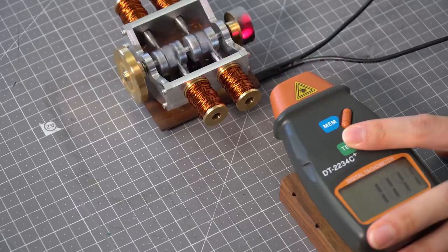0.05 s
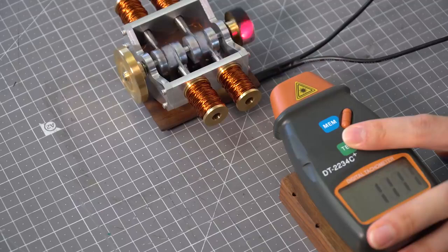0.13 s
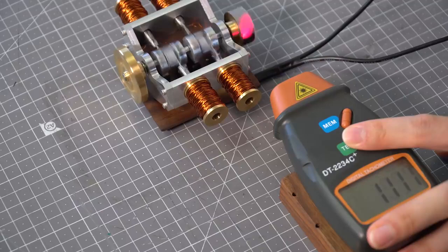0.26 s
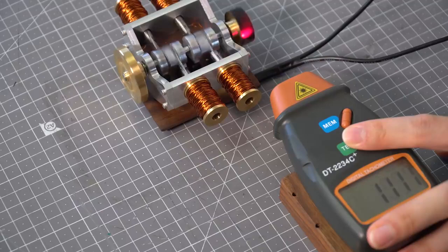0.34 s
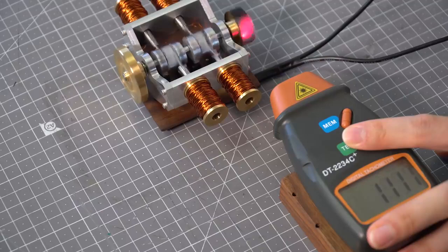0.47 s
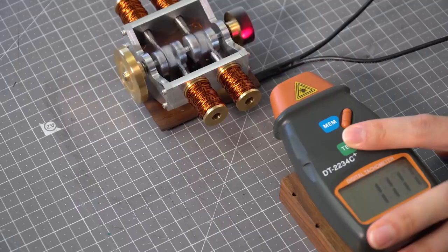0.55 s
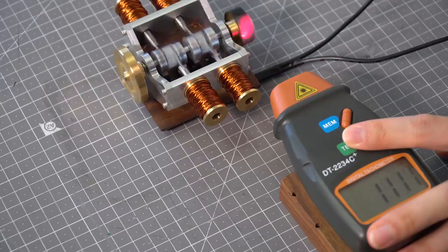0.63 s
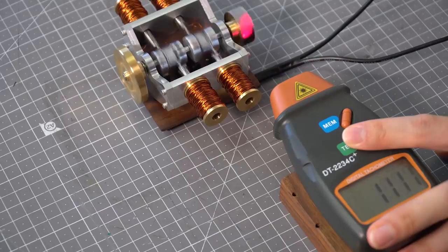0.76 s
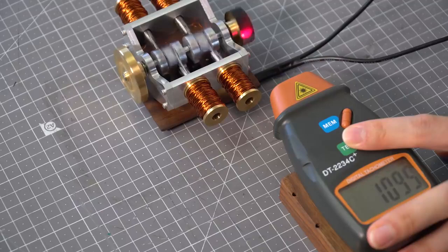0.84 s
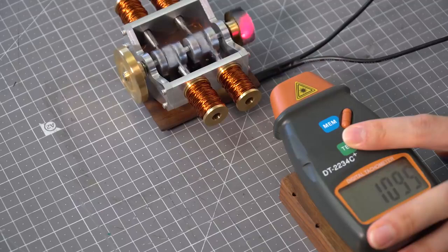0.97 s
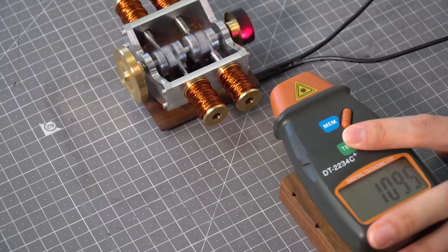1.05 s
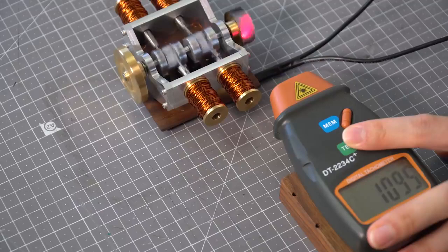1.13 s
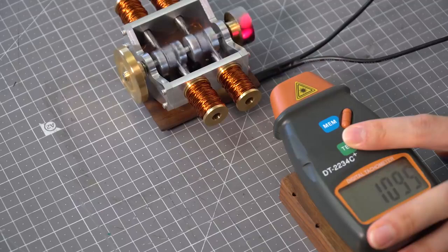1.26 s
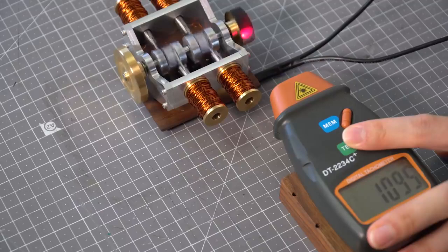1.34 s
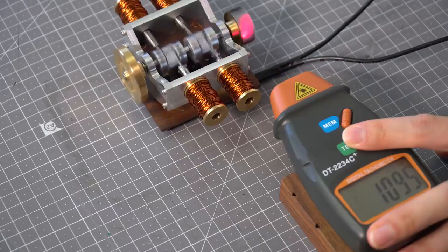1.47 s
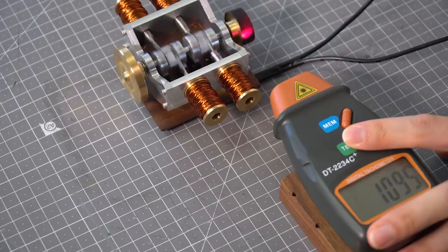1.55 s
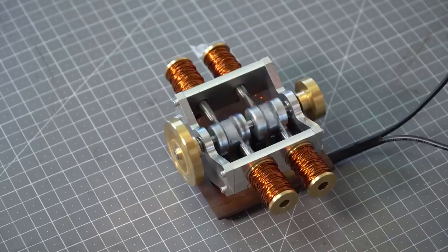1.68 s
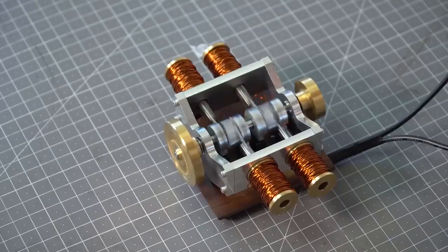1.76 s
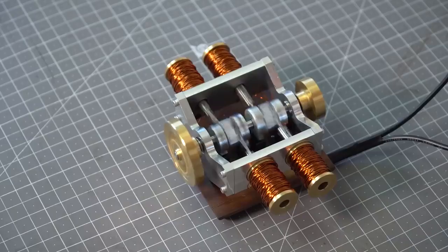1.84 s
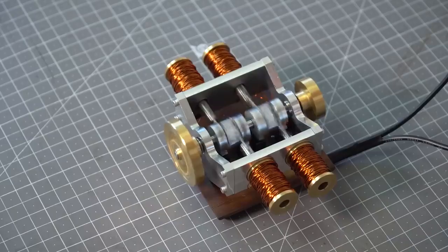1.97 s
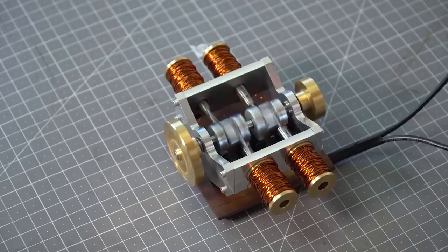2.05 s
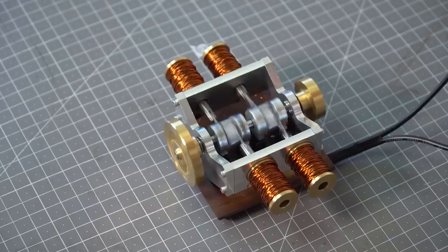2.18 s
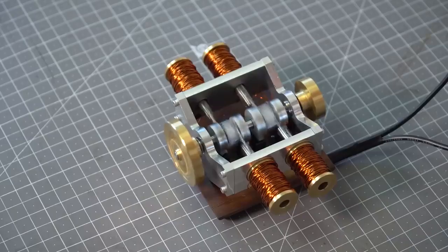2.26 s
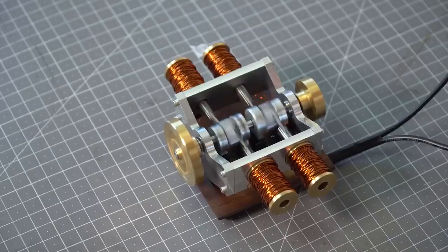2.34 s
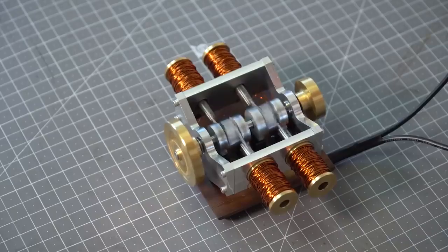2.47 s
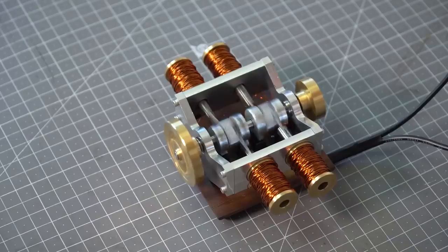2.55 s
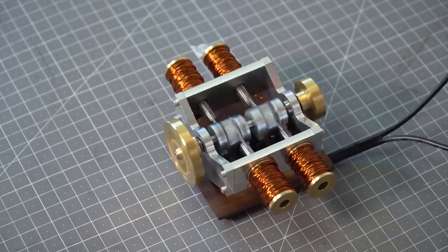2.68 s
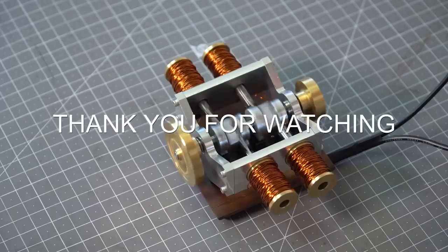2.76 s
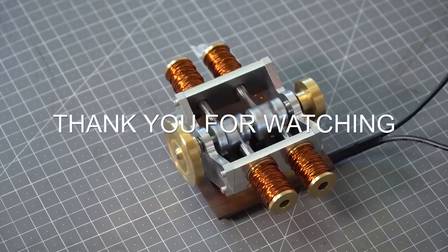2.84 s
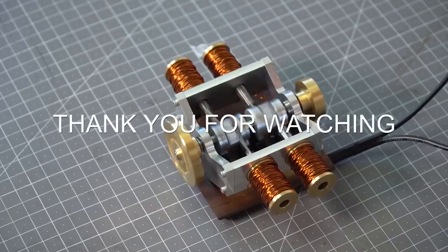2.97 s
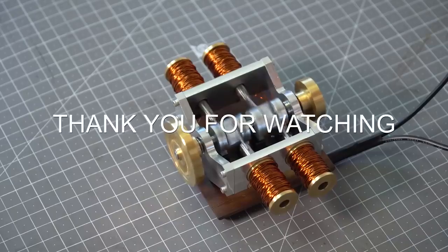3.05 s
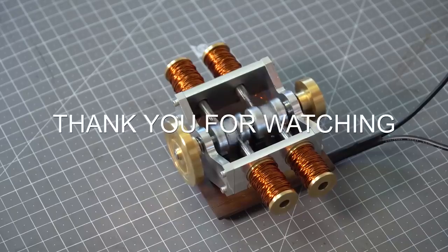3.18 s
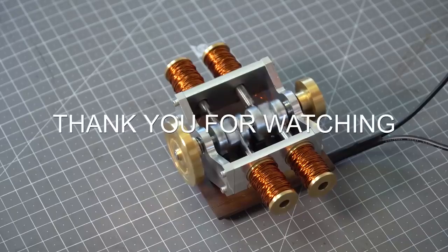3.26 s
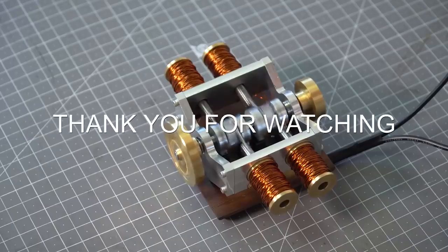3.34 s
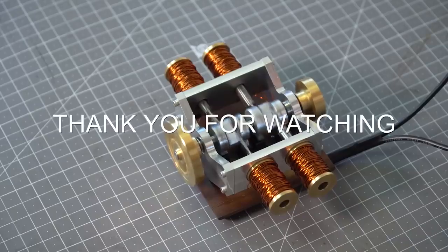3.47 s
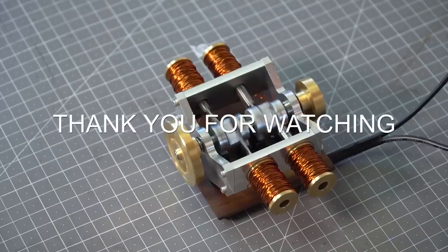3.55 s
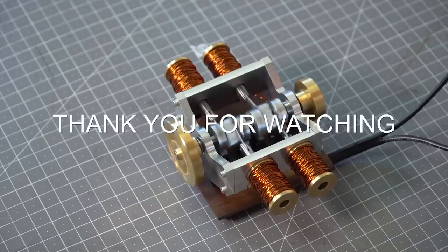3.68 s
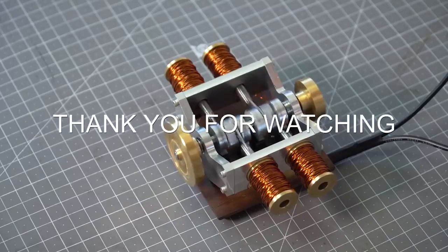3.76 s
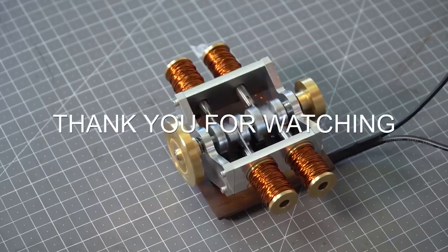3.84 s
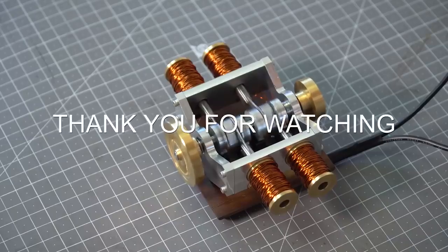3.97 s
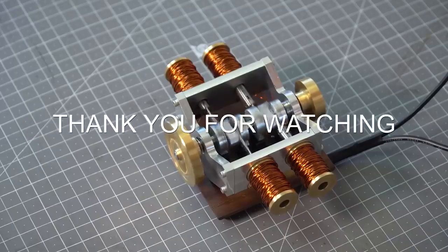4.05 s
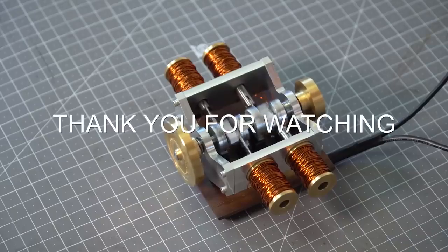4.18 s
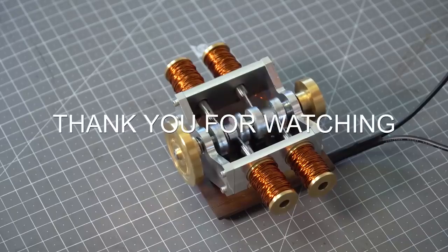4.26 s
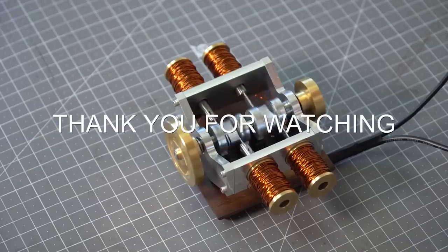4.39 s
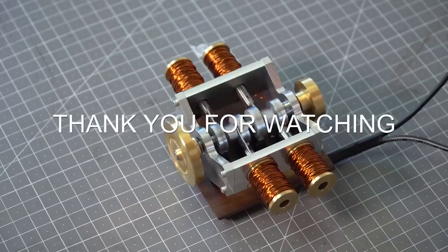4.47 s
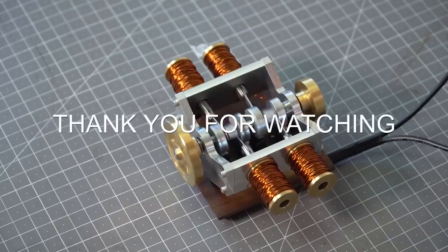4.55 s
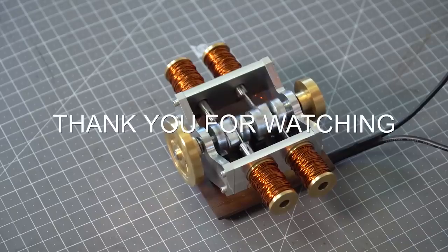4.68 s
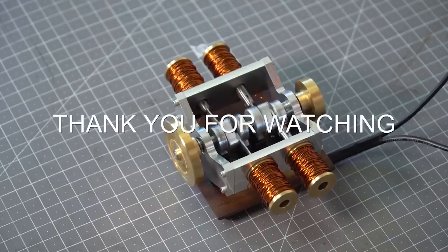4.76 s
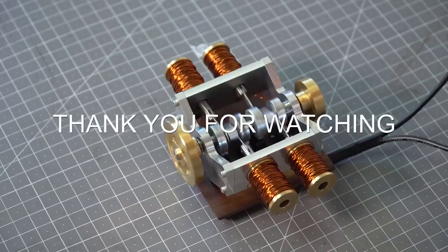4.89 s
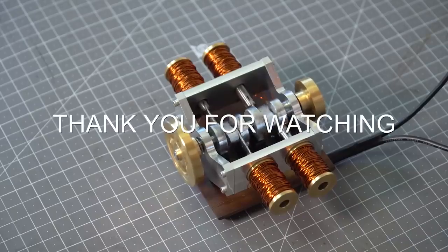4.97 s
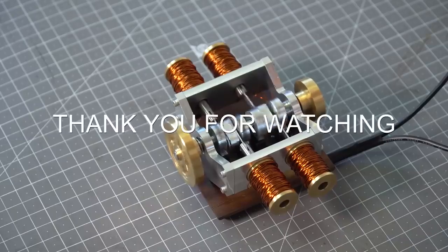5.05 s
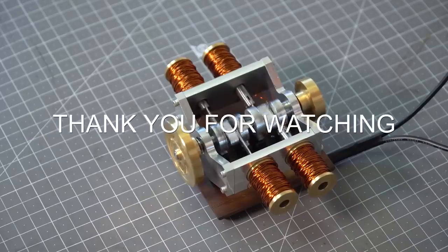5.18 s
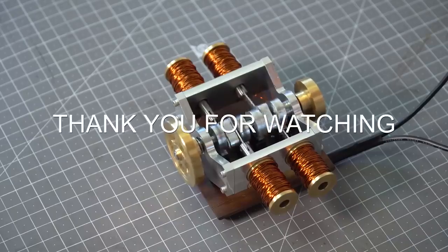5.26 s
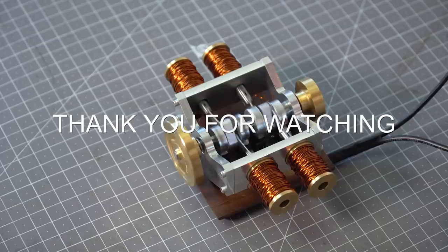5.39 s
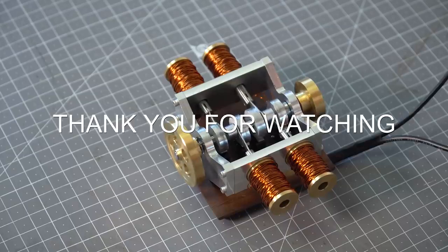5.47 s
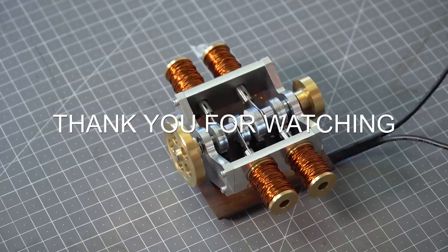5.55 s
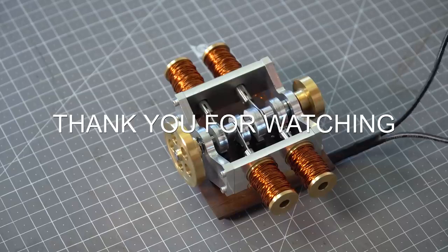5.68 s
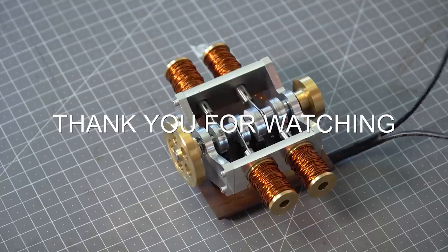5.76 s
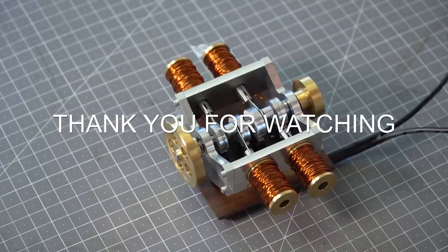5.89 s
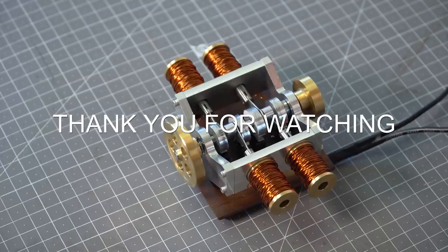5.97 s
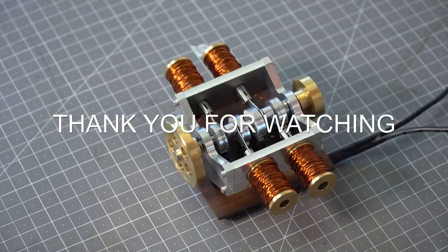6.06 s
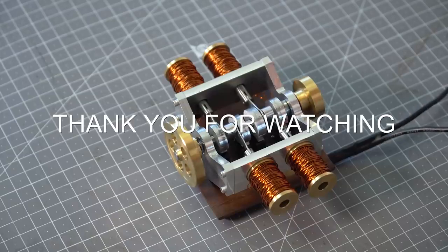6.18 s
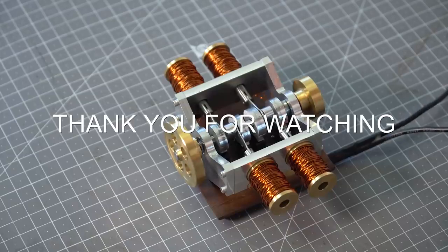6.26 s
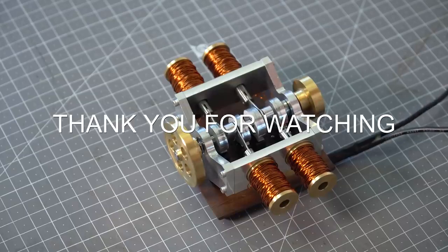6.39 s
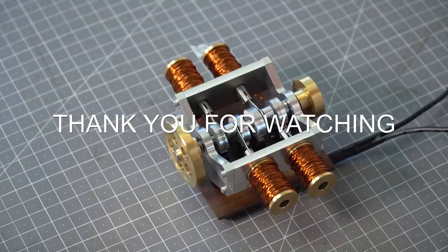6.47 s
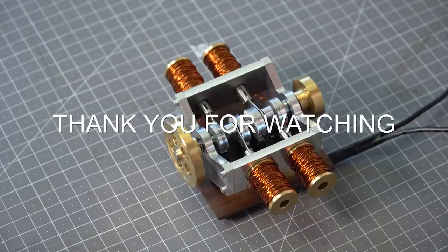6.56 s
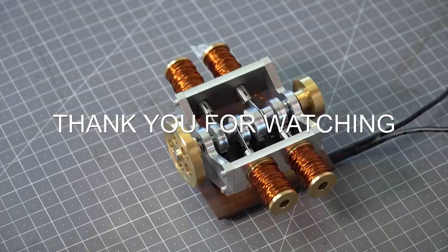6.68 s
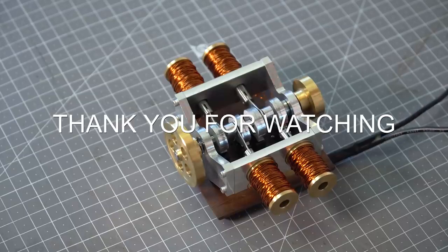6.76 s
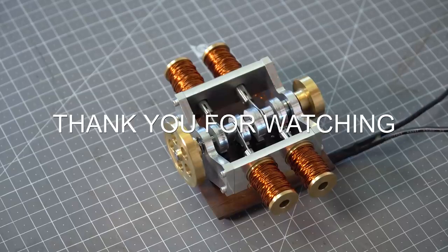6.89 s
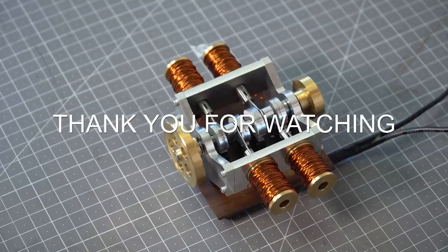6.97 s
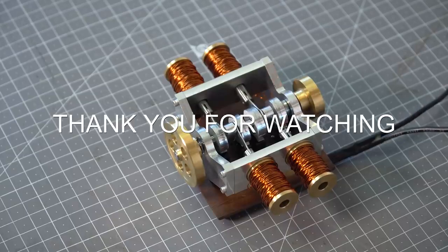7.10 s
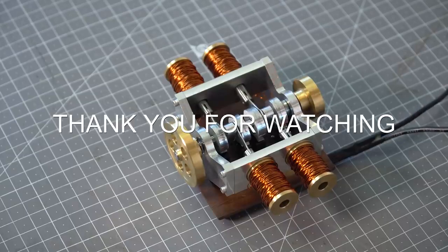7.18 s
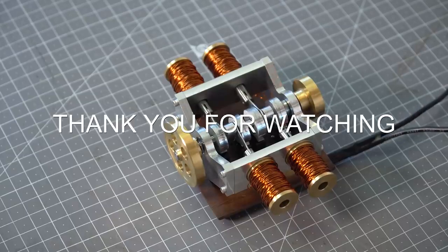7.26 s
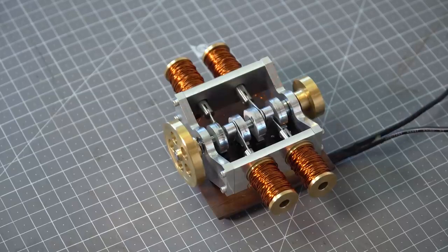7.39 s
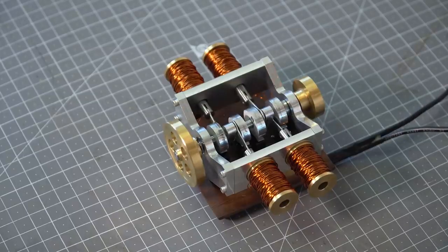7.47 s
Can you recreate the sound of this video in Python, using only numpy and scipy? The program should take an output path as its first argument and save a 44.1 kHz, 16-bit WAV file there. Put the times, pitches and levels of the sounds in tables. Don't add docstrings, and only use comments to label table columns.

```python
import sys
import numpy as np
from scipy import signal
from scipy.fft import rfft, irfft
from scipy.io import wavfile
from scipy.ndimage import uniform_filter1d

SR = 44100
rng = np.random.default_rng(int(sys.argv[2]) if len(sys.argv) > 2 else 0)


def elevation(decibels):
    levels = np.asarray(decibels, float)
    return 10 ** (levels / 20)


def persist_wave(psi):
    counts = np.round(np.clip(psi, -1, 1) * 32767).astype(np.int16)
    wavfile.write(sys.argv[1], SR, np.atleast_2d(counts).T)


N = 332068
TIME = np.arange(N) / SR
FIRST_TOP_TURN = 37

# time in seconds, bright peak in dB, knock peak in dB.
CRANK_TOPS = [(3.7634, -18, -21), (3.8515, -23, -22), (3.946, -20, -20.5), (4.0504, -11, -26),
              (4.161, -16, -25), (4.2772, -16, -23), (4.4068, -11.5, -20.5), (4.5437, -13, -21.5),
              (4.694, -11.5, -19.5), (4.8538, -19.5, -26), (5.0315, -21, -26.5), (5.239, -20, -26.5),
              (5.4676, -24, -29)]
# time in seconds, bright peak in dB.
CAM_CLICKS = [(3.665, -14), (3.748, -16), (3.8353, -15), (3.932, -16), (4.0318, -17), (4.141, -16),
              (4.258, -19.5), (4.384, -19), (4.5204, -16.5), (4.668, -19), (4.826, -17.5), (4.9987, -18),
              (5.193, -18), (5.4126, -17.5)]


def in_time(rows):
    s, *columns = np.transpose(rows)
    return [np.interp(TIME, s, column) for column in columns]


def at_hz(points, hz):
    point_hz, point_db = np.array(points).T
    return np.interp(np.log(hz), np.log(point_hz), point_db)


def rms_one(x):
    return x / np.sqrt(np.mean(x ** 2) + 1e-20)


def drift(knots_per_s):
    knots = rng.standard_normal(600)
    return np.interp(TIME * knots_per_s, np.arange(600), knots)


def high_pass(x, hz):
    return signal.sosfilt(signal.butter(2, hz, "high", fs=SR, output="sos"), x)


def left_right(mid, side):
    return np.array([mid + side, mid - side])


def background():
    # frequency in Hz, density in dB per Hz.
    floor_spectrum = [(15, -40), (25, -4), (55, 1.5), (174, -7), (282, -5.5), (369, -7), (510, -9.5),
                      (744, -17.5), (1000, -11), (1310, -18), (1500, -18.5), (1910, -23.5), (12200, -30),
                      (15600, -27)]
    # frequency in Hz, side minus mid in dB.
    floor_width = [(60, -24), (180, -5), (550, -0.5), (1650, 2), (4970, 0.5), (15000, -2)]
    hz = np.maximum(np.arange(N // 2 + 1) * SR / N, 10)
    mid, side = irfft(rfft(rng.standard_normal((2, N))) * elevation(at_hz(floor_spectrum, hz)), N)
    side = irfft(rfft(side) * elevation(at_hz(floor_width, hz)), N)
    return np.array([mid, side]) / mid.std() * elevation(-57.5)


def room(x):
    t60_s, level_db = 0.53, -6.5
    t = np.arange(SR // 2) / SR
    tails = rng.standard_normal((2, len(t))) * elevation(-60 * t / t60_s) * (t > .003)
    tails = tails / np.sqrt(np.sum(tails[0] ** 2))
    wet = signal.fftconvolve(x[None, :], tails, axes=1)[:, :N]
    wet = signal.lfilter(*signal.butter(1, 9000, fs=SR), wet)
    wet[1] = high_pass(wet[1], 1500) * elevation(-3.5)
    return elevation(level_db) * wet


def crank(table):
    (s0, k0), (s1, k1) = table[:2]
    a_second_before = (s0 - 1, k0 - (k1 - k0) / (s1 - s0))
    return in_time([a_second_before] + list(table))[0]


def rattle_db(full_db, slow_db):
    follows_speed = [0.66, 1.08, 1.134, 1.19]
    scrape_db = [8, -3, 0, 2]
    dying_db_per_s = [90, 40, 150, 140]
    after_s = TIME - 5.553
    rise = np.clip(after_s / 0.027, 0, 1)
    dying_s = np.maximum(after_s - .02, 0)
    return [db + share * slow_db + jump * rise - fall * dying_s
            for db, share, jump, fall in zip(full_db, follows_speed, scrape_db, dying_db_per_s)]


def contacts(turns, table, until_s, level_db, slack_turns, spread_db):
    driven, coasting_turns, tick_db, knock_db = np.transpose(table)
    turn = np.arange(-1, 40)[:, None]
    free = np.clip((turn - 30.0) / 9.0, 0, 1)
    luck = np.clip(rng.standard_normal((2, len(turn), len(table))), -1.4, 1.4)
    angle = turn + driven + free * (coasting_turns - driven) + slack_turns * luck[0]
    times_s = np.interp(angle, turns, TIME).ravel()
    gain_db = np.interp(times_s, TIME, level_db) + 22.5 + spread_db * luck[1].ravel()
    tick_db = np.tile(tick_db, len(turn)) + gain_db - 3
    knock_db = np.tile(knock_db, len(turn)) + gain_db
    keep = (times_s > 0) & (times_s < until_s)
    return times_s[keep], tick_db[keep], knock_db[keep] - 11, knock_db[keep] - 33


def strikes(times_s, level_db, bounce_s, fall_db):
    out = np.zeros((2, N))
    luck = rng.random((len(times_s), 10))
    for k in range(5):
        delay_s = bounce_s * (k + (k > 0) * 1.6 * (luck[:, k] - .5))
        at = np.clip(np.round((times_s + delay_s) * SR).astype(int), 0, N - 1)
        height = elevation(level_db + k * fall_db)
        np.add.at(out[0], at, height * (-1) ** k)
        np.add.at(out[1], at, height * (2 * luck[:, 5 + k] - 1))
    return out


def resonate(x, hz, width_hz):
    r = np.exp(-np.pi * width_hz / SR)
    b = [(1 - r * r) / 2, 0, (r * r - 1) / 2]
    a = [1, -2 * r * np.cos(2 * np.pi * hz / SR), r * r]
    return signal.lfilter(b, a, x + 1e-18)


def ring(x, modes, flicker_db=0):
    # frequency in Hz, side minus mid in dB.
    object_width = [(60, -65), (130, -65), (290, -19.5), (640, -9), (1410, -15.5), (3100, -5.5),
                    (6820, -1.5), (15000, -5)]
    flickers_per_s = 70
    step = np.arange(x.shape[1]) * flickers_per_s / SR
    pushes = elevation(flicker_db * rng.standard_normal((len(modes), 400)))
    out = 0
    for k, (hz, width_hz, db) in enumerate(modes):
        pushed = x * np.interp(step, np.arange(400), pushes[k]) if flicker_db else x
        mid_side = [[1], [elevation(at_hz(object_width, hz))]]
        out = out + (-1) ** k * elevation(db) * resonate(pushed, hz, width_hz) * mid_side
    return out


def uneven_drag(turns, slow_db):
    drag_angles = [.004, .06, .18, .3, .38, .46, .56, .64, .74, .82, .9, .998]
    # frame in dB, bright in dB.
    drag_db = [(4.5, 2), (3.5, 1.5), (1.5, -1), (0.5, -2), (1, 3), (1, 1.5), (0, 1.5), (-3, -0.5),
               (-1.5, -2), (-1, 0), (-2.5, 0), (-1, 0)]
    depth = 0.09 - 0.1755 * np.minimum(slow_db, 0)
    frame_db, bright_db = (depth * np.interp(turns, drag_angles, db, period=1) for db in np.transpose(drag_db))
    return depth, frame_db, bright_db


def rattle_grains(turns, size_db):
    grains_per_turn, least_per_s = 200, 500
    chance = np.maximum(grains_per_turn * np.gradient(turns), least_per_s / SR)
    size = elevation(size_db * np.minimum(rng.exponential(1, N), 2.6)) / np.sqrt(chance)
    grains = (rng.random(N) < chance) * size
    return grains * rng.choice([-1, 1], (2, N)) + 0.78 * rng.standard_normal((2, N))


def engine(turns, body, parts_db, slow_db, hits, heard, rub, size_db):
    # frequency in Hz, width in Hz, level in dB.
    rods = [(2590, 45, -3), (3030, 35, -2), (3175, 45, 2), (3380, 35, -1), (3600, 45, -2), (3963, 40, -2),
            (4420, 35, -2), (4600, 45, -2), (4800, 60, -4)]
    flicker_db = 1.6
    times_s, tick_db, knock_db, hollow_db = hits
    depth, frame_db, bright_db = uneven_drag(turns, slow_db)
    grains = rattle_grains(turns, size_db)
    knocks = strikes(times_s, knock_db + 2.5, .0012, -10)
    ticks = strikes(times_s, tick_db + 1, 0.00045, -5)
    blows = [knocks, strikes(times_s, hollow_db, 0.00205, -8.0), knocks, ticks, ticks]

    base, low, frame, bright = parts_db
    angle, rub_low_db, rub_frame_db = np.transpose(rub)
    driven = np.clip(1.5 + slow_db / 4.0, 0, 1)
    low = low + driven * np.interp(turns, angle, rub_low_db, period=1)
    frame = frame + driven * np.interp(turns, angle, rub_frame_db, period=1)
    levels_db = [base + 0.22 * frame_db, low + 0.95 * frame_db, frame + frame_db, bright - 2.5 + bright_db,
                 bright - 2.6 + 0.77 * bright_db - 0.82 * depth]
    hit_db = [0.92, 31.0, 18.27, 6.5, 8.1]
    edges_hz = [0, 600, 1900, 6000, 10500, SR]

    out = np.zeros((2, N))
    for part, level_db in enumerate(levels_db):
        modes = [m for m in body if edges_hz[part] < m[0] < edges_hz[part + 1]]
        rattle = ring(grains[:, heard], modes, flicker_db * (part in (1, 2)))
        struck = ring(blows[part][:, heard], modes)
        if part == 2:
            rattle = rattle + ring(np.roll(grains, 300, axis=1)[:, heard], rods, flicker_db)
            struck = struck + ring(knocks[:, heard], rods)
        rattle_gain = elevation(level_db + 0.77 * drift(14))[heard]
        out[:, heard] += rattle / rattle[0].std() * rattle_gain + struck * elevation(hit_db[part])

    snaps = strikes(times_s, tick_db, .0003, -12) * [[1], [.4]]
    out += elevation(3 + 5.5 * depth) * high_pass(snaps, 12000)
    out -= 0.42 * resonate(out, 1797, 170)
    return high_pass(out, 65)


def clacks(turns, angle_turns, strength, modes):
    s = np.interp(np.arange(33) + angle_turns, turns, TIME)
    level_db = np.interp(s, *np.transpose(strength)) + 1.5 * rng.standard_normal(len(s))
    return ring(strikes(s, level_db, .0007, -10), modes)


def shaking(turns, orders, gain_db, wobble):
    out = 0
    for multiple, db in orders:
        level = np.sqrt(2) * elevation(db + gain_db + 3.0 * wobble * drift(7))
        out = out + level * np.sin(2 * np.pi * (multiple * turns + .04 * wobble * drift(6)))
    return out


def first_stand(turns):
    # angle driven in turns, angle coasting in turns, bright tick in dB, frame knock in dB.
    play_taken_up = [(0, 0, -5, -9), (.11, .11, -2, -7), (.225, .225, -5, -9), (.33, .33, -3, -6),
                     (.53, .53, -8, -10), (.57, .57, -8, -10), (.715, .715, -5, -9), (.805, .805, -7, -2),
                     (.97, .97, -7, -8)]
    full_rattle_db = [-43, -37.5, -30.5, -34]
    # frequency in Hz, width in Hz, level in dB.
    body = [(79, 21, 0.5), (150, 54, -0.5), (258, 39, 1.5), (383, 130, -3.5), (526, 240, -6),
            (677, 150, -17), (886, 250, -5), (1159, 33, 4.5), (1407, 160, 1.5), (2090, 380, -1),
            (2617, 140, 2.5), (2798, 49, 6.5), (3200, 206, 3.5), (3505, 170, 5.5), (4280, 960, 1),
            (5060, 270, 4), (5390, 680, -0.5), (7800, 1500, 1.5), (8910, 500, 5), (11530, 2600, 0.5),
            (15400, 890, 0)]
    # angle in turns, frame low in dB, frame in dB.
    rub = [(0.01, -2, 0), (.1, -1, -1.5), (.18, 0.5, -2), (.27, -0.5, -1.5), (.35, -0.5, 1),
           (.43, -0.5, -1), (.6, 3.5, -0.5), (.72, -1.5, -0.5), (.79, -9, -3.5), (.82, 1.5, 5.5),
           (.86, 1, -3.5), (.91, -1.5, 4.5)]
    # multiple of the crank speed, rms in dB.
    shake = [(5, -53), (8, -56), (10, -57), (13, -51), (18, -62)]
    # time in seconds, level in dB.
    clack_db = [(0, 1.5), (.6, 1.5), (.8, -4), (1.3, -3), (1.45, 0), (1.75, -1)]
    # frequency in Hz, width in Hz, level in dB.
    clack_modes = [(3900, 800, 0), (4750, 900, 0)]
    heard = slice(0, int(1.85 * SR))
    slow_db = 0 * TIME
    parts_db = rattle_db(full_rattle_db, slow_db)
    hits = contacts(turns, play_taken_up, 1.8, parts_db[2], slack_turns=.003, spread_db=1.8)
    air = engine(turns, body, parts_db, slow_db, hits, heard, rub, size_db=2.5)
    air += clacks(turns, .803, clack_db, clack_modes)
    return air, shaking(turns, shake, 0, wobble=0.7)


def table_hum(turns):
    # multiple of the crank speed, level in dB.
    hum = [(2.97, -0.5)]
    # time in seconds, level in dB.
    swell = [(0, -49), (.56, -50), (.67, -44), (.78, -44), (.86, -37), (1.216, -33.5), (1.726, -41),
             (1.79, -62)]
    return shaking(turns, hum, in_time(swell)[0], wobble=0.25)


def slowing_db(turns):
    full_turns_per_s = 19.0
    turns_per_s = uniform_filter1d(np.gradient(turns) * SR, size=6000)
    return 20 * np.log10(np.clip(turns_per_s / full_turns_per_s, .18, 1.06))


def coasting(turns, frame_db):
    # angle in turns, bright and knock in dB over the rattle.
    play_between = [(.065, 8, 6), (.2, 4, 4)]
    # time in seconds,
    # bright peak in dB, knock peak in dB.
    more_contacts = [(3.72, -24, -25), (3.813, -24, -24), (3.904, -28, -24), (3.998, -27, -29),
                     (4.104, -28, -28), (4.149, -28, -25), (4.212, -34, -36), (4.2186, -32, -32),
                     (4.325, -30, -28), (4.342, -26, -28), (4.455, -28, -30), (4.4752, -28, -27),
                     (4.619, -23, -29), (4.629, -30, -33), (4.7396, -34, -32), (4.7531, -30, -34),
                     (4.7735, -25, -29), (4.919, -23, -32), (4.9414, -27, -32), (4.9547, -26, -36),
                     (5.021, -34, -25), (5.1058, -28, -41), (5.1208, -31, -29), (5.1296, -26, -32),
                     (5.1453, -23, -30), (5.1504, -28, -35), (5.1986, -31, -40), (5.2445, -30, -46),
                     (5.3228, -28, -38), (5.3297, -26, -46), (5.3447, -28, -28), (5.473, -34, -33),
                     (4.0366, -32, -28), (4.096, -34, -30), (4.61, -36, -31), (4.768, -34, -35),
                     (4.93, -36, -33), (5.037, -32, -33), (5.045, -29, -37), (5.049, -30, -30),
                     (5.339, -38, -42), (5.5543, -33, -42), (5.559, -28, -38), (5.5718, -29, -32),
                     (5.578, -27, -27)]
    angle, tick_db, knock_db = np.transpose(play_between)
    turn = np.arange(FIRST_TOP_TURN - 1, FIRST_TOP_TURN + len(CRANK_TOPS) - 1)[:, None]
    luck = np.clip(rng.standard_normal((len(turn), 3, len(play_between))), -1.5, 1.5)
    s = np.interp(turn + angle + .008 * luck[:, 0], turns, TIME)
    level_db = np.interp(s, TIME, frame_db)
    play_tick_db = level_db + tick_db + 2.0 * luck[:, 1]
    play_knock_db = level_db + knock_db + 2.9 * luck[:, 2]
    play = np.array([s, play_tick_db, play_knock_db]).reshape(3, -1)
    cam = [(click_s, db, db - 19) for click_s, db in CAM_CLICKS]
    s, tick_db, knock_db = np.c_[np.transpose(CRANK_TOPS + cam + more_contacts), play]
    hollow_db = knock_db - 40 + 2.7 * rng.standard_normal(len(s))
    return s, tick_db, knock_db, hollow_db


def pings():
    # frequency in Hz, width in Hz, level in dB.
    spring = [(2860, 240, 0)]
    s, db = np.transpose(CAM_CLICKS)
    return ring(strikes(s, db + 11, .001, 0), spring)


def second_stand(turns):
    # angle driven in turns, angle coasting in turns, bright tick in dB, frame knock in dB.
    play_taken_up = [(-.005, .005, -4, -6), (.07, .13, -11, -10), (.225, .37, -3, -4), (.385, .44, -9, -4),
                     (.462, .51, -2, -2), (.63, .63, -13, -11), (.708, .78, -3, -6), (.783, .835, -2, -7)]
    full_rattle_db = [-43, -40, -30.5, -27.5]
    # frequency in Hz, width in Hz, level in dB.
    body = [(92.6, 25, 2.5), (158.6, 17, 5), (222.6, 17, 7), (282, 18.4, 0.5), (337, 14, 2), (415, 25, -1),
            (454, 37, -1.5), (541, 30, -3.5), (634, 69, -2), (788, 33, 5.5), (853, 54, 3), (1165, 31, 6.5),
            (1226, 19, 4.5), (1300, 83, 3.5), (2040, 500, -0.5), (2674, 234, 4.5), (3036, 230, 2.5),
            (3336, 120, 7), (3420, 260, 4), (4130, 660, 2.5), (4880, 980, 1.5), (5860, 880, 1.5),
            (7480, 1750, 2.5), (9390, 2930, 5.5), (11270, 5400, 1.5), (15100, 700, 0.5)]
    # angle in turns, frame low in dB, frame in dB.
    rub = [(0.01, 2, 0.5), (.1, -0.5, 2.5), (.2, -0.5, -2), (.3, 2.5, -1), (.4, -4, 2), (.5, -6, -1.5),
           (.57, 2.5, 3), (.64, -3, -3), (.72, -1, 2.5), (.8, 4, -1.5), (.9, -5.5, 2)]
    # multiple of the crank speed, rms in dB.
    shake = [(4, -59), (5, -49), (8, -47), (12, -52), (17, -54), (23, -57)]
    # time in seconds, level in dB.
    clink_db = [(1.75, 4), (2.4, 6), (2.6, 11), (2.95, 10), (3.3, 7), (3.5, 1)]
    # frequency in Hz, width in Hz, level in dB.
    clink_modes = [(3080, 64, 0), (3220, 88, 1)]
    heard = slice(int(1.65 * SR), int(5.75 * SR))
    slow_db = slowing_db(turns)
    parts_db = rattle_db(full_rattle_db, slow_db)
    driven = contacts(turns, play_taken_up, 3.66, parts_db[2], slack_turns=.004, spread_db=1.5)
    hits = [np.r_[a, b] for a, b in zip(driven, coasting(turns, parts_db[2]))]
    air = engine(turns, body, parts_db, slow_db, hits, heard, rub, size_db=2.2)
    air += pings()
    air += clacks(turns, .385, clink_db, clink_modes)
    air *= np.clip((5.7 - TIME) / 0.014, 0, 1)
    return air, shaking(turns, shake, 1.4 * (parts_db[2] + 31), wobble=0.4)


def hand():
    # time in seconds, peak in dB, frequency in Hz.
    thuds = [
        (5.569, -42, 105),
        (5.589, -48, 246),
        (5.679, -39.5, 220),
        (5.98, -42, 150),
        (6.001, -37.5, 182),
        (6.025, -37, 106),
        (6.059, -47, 90),
        (6.1, -50, 60),
    ]
    # start and length in seconds, level in dB, centre in Hz, width in Hz.
    rustles = [(5.757, 0.13, -61, 62, 22), (6.055, 0.28, -59, 50, 15), (6.16, 0.0097, -54, 3000, 1500),
               (6.156, 0.3, -60.5, 1050, 350), (7, .14, -69, 2700, 1500), (6.19, 0.17, -69, 5300, 300),
               (6.228, 0.027, -59, 5200, 460), (6.499, 0.055, -51, 1900, 350),
               (6.495, 0.054, -63, 600, 400), (6.25, .06, -72, 5400, 250), (5.572, 0.14, -52, 9100, 700),
               (7.4, .06, -63, 1150, 200), (6.488, 0.13, -56, 900, 1200), (6.493, 0.13, -63, 4900, 5000),
               (7.053, 0.49, -68.5, 1900, 1700)]
    out, late = np.zeros(N), slice(int(5.5 * SR), N)
    for s, db, hz in thuds:
        t = np.maximum(TIME[late] - s, 0)
        out[late] += elevation(db - 60 * t / 0.073) * np.sin(2 * np.pi * hz * t)
    for s, length_s, db, hz, width_hz in rustles:
        t = (TIME[late] - s) / length_s
        shape = np.clip(t * 15.0, 0, 1) * np.clip(1 - t, 0, 1) ** 1.06
        noise = rms_one(resonate(rng.standard_normal(len(t)), hz, width_hz))
        out[late] += elevation(db + 1.9 * drift(60)[late]) * shape * noise
    return out


def scene():
    # time in seconds, angle in turns.
    marks_1 = [(0.01, 0), (0.4451, 8), (1.3282, 24), (1.7733, 32)]
    # time in seconds, angle in turns.
    marks_2 = [(1.735, 0), (2.1351, 8), (2.5418, 16), (2.9531, 24), (3.2713, 30), (3.3905, 32),
               (3.5251, 34), (3.6787, 36)]
    change_s, fade_s, rest_s = 1.755, 0.047, 5.75
    tops = [(row[0], FIRST_TOP_TURN + k) for k, row in enumerate(CRANK_TOPS)]
    rest = (rest_s, FIRST_TOP_TURN + len(CRANK_TOPS))
    turns_1, turns_2 = crank(marks_1), crank(marks_2 + tops + [rest])
    first, table_1 = first_stand(turns_1)
    second, table_2 = second_stand(turns_2)
    share = np.clip((TIME - change_s) / fade_s + .5, 0, 1)
    near = first * np.sqrt(1 - share) + second * np.sqrt(share)
    near[0] += hand()
    mid, side = near + room(near[0]) + background()
    table = table_1 * np.sqrt(1 - share) + table_2 * np.sqrt(share)
    return left_right(mid, side) + table + table_hum(turns_1)


def top_cut(x):
    return signal.sosfilt(signal.butter(12, 17010, fs=SR, output="sos"), x)


def record(dry):
    top_hz, sudden_db, end_s = 16050, 31, 7.5
    cut = signal.sosfilt(signal.cheby2(14, 40, top_hz, fs=SR, output="sos"), dry)
    top_band = signal.cheby2(8, 50, [top_hz - 300, top_hz + 700], "band", fs=SR, output="sos")
    top = signal.sosfilt(top_band, dry)
    treble = np.diff(dry.sum(axis=0), 2, prepend=[0, 0]) ** 2
    sudden = uniform_filter1d(treble, size=40) > elevation(sudden_db) * uniform_filter1d(treble, size=1500)
    cut = cut + .5 * top * np.minimum(5 * uniform_filter1d(1. * sudden, size=200), 1)
    cut *= np.clip((end_s + 0.0042 - TIME) / 0.0017, .03, 1)
    return top_cut(cut)


dry = scene()
out = record(dry)
persist_wave(out)
```